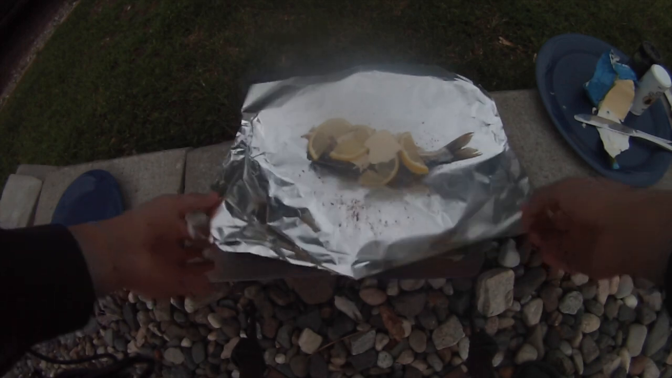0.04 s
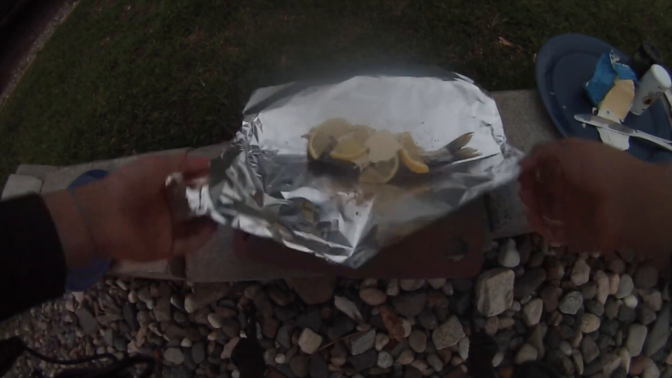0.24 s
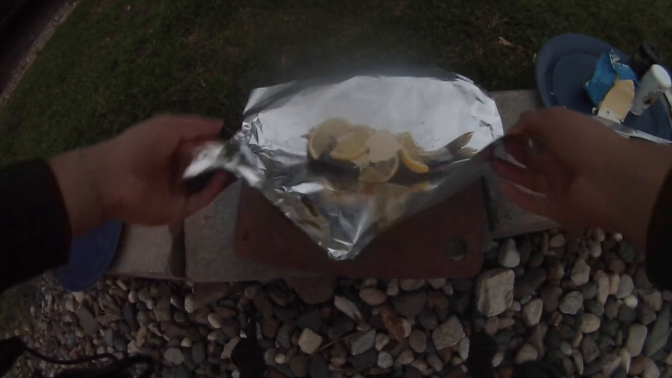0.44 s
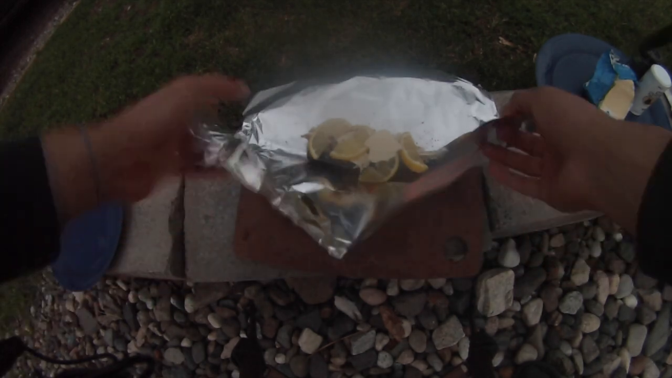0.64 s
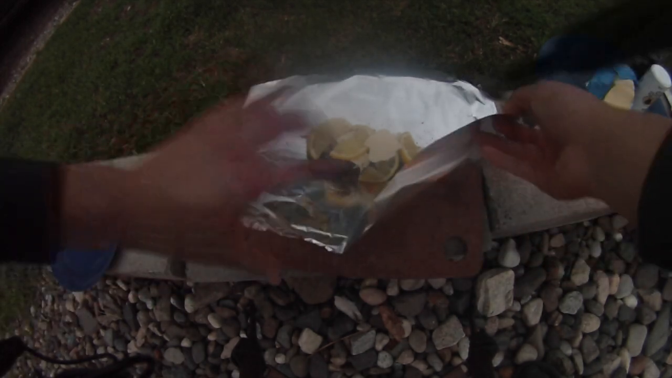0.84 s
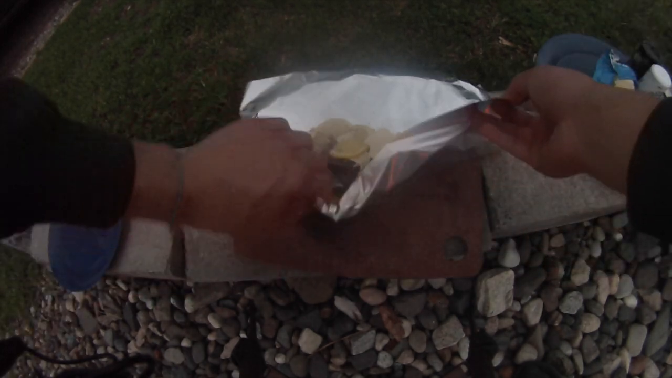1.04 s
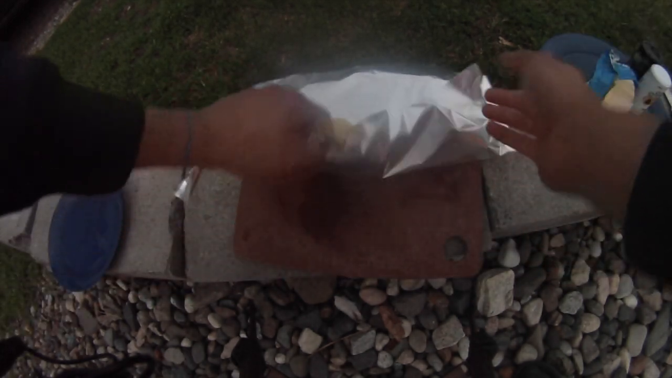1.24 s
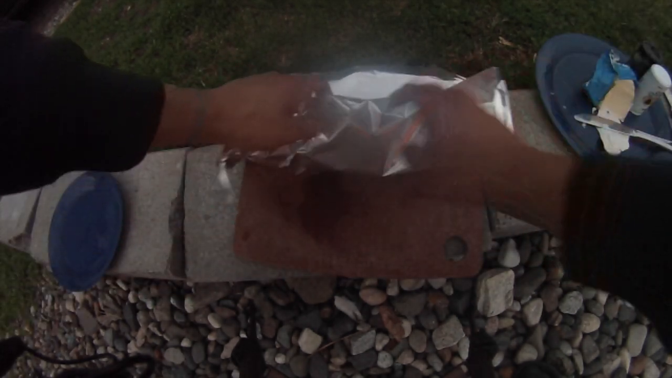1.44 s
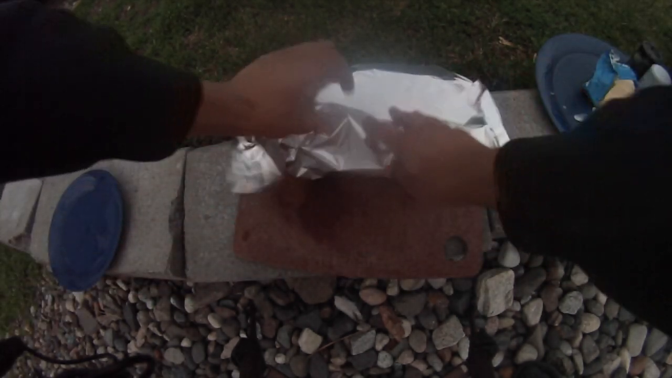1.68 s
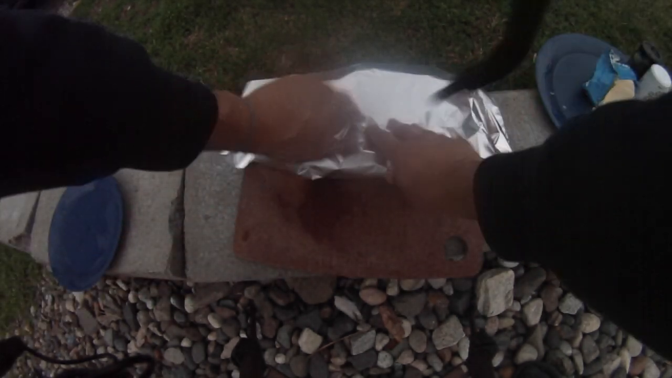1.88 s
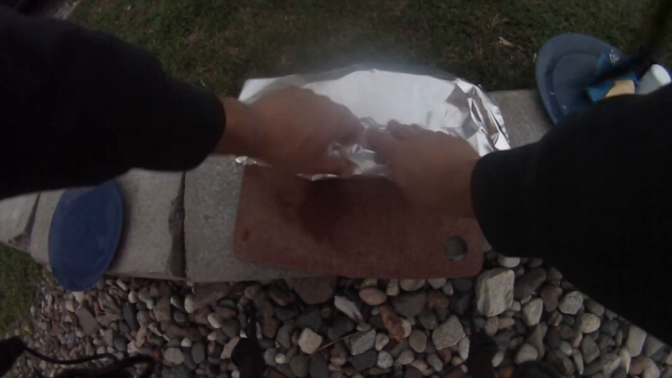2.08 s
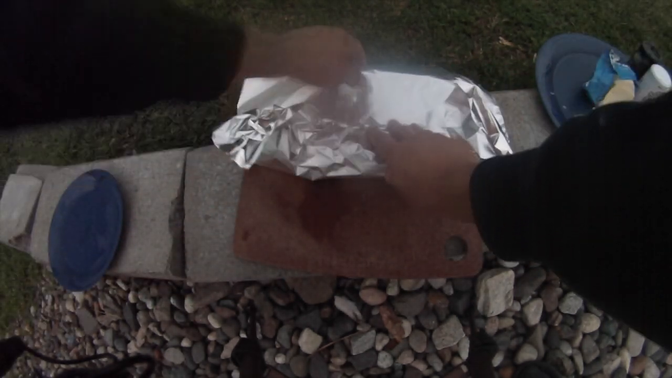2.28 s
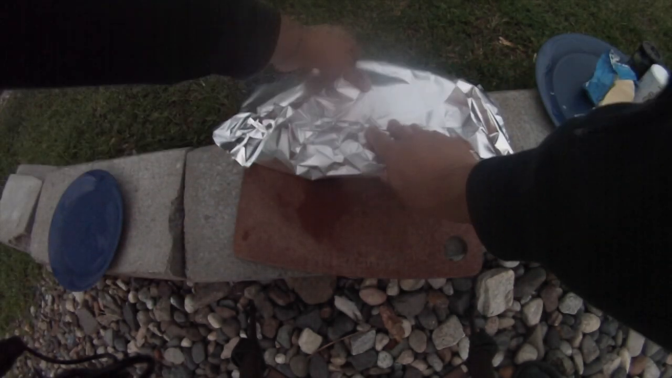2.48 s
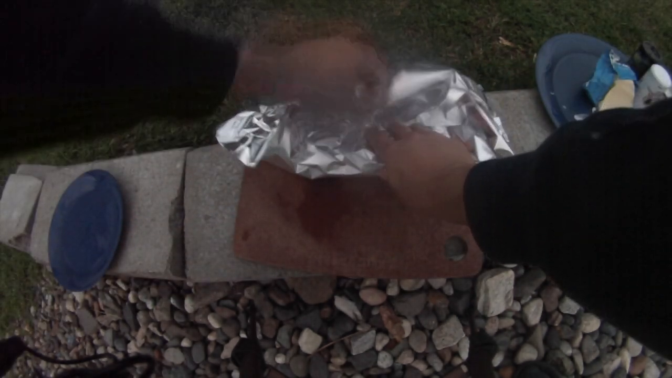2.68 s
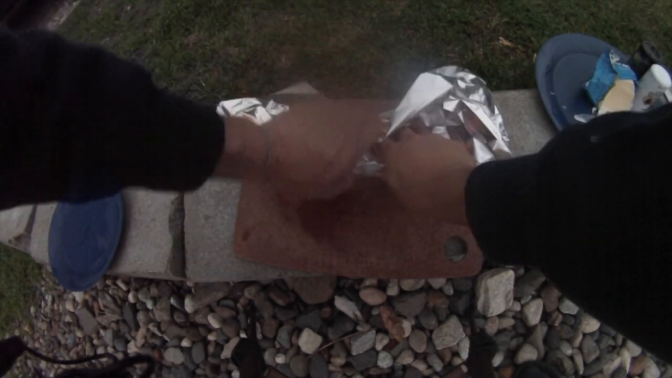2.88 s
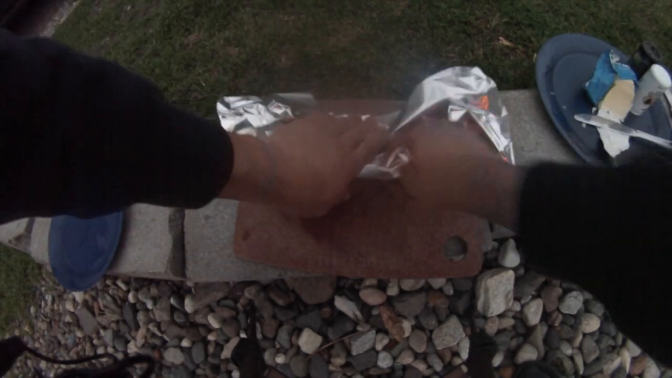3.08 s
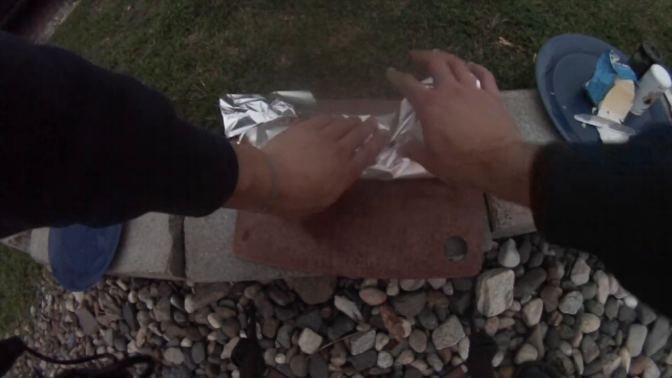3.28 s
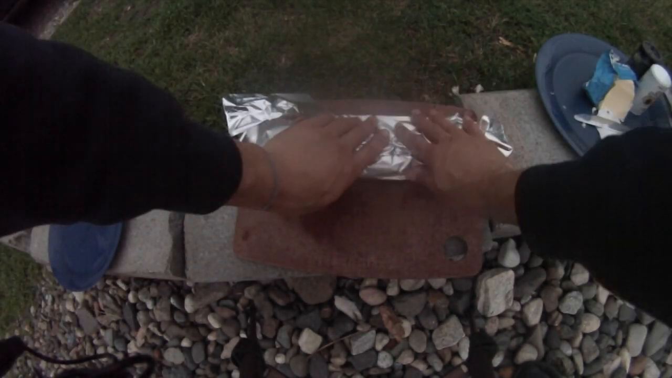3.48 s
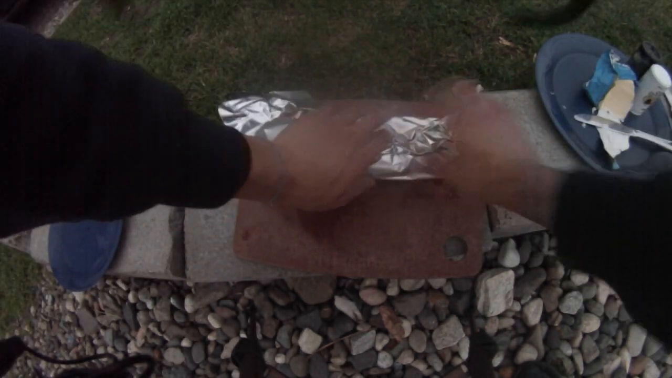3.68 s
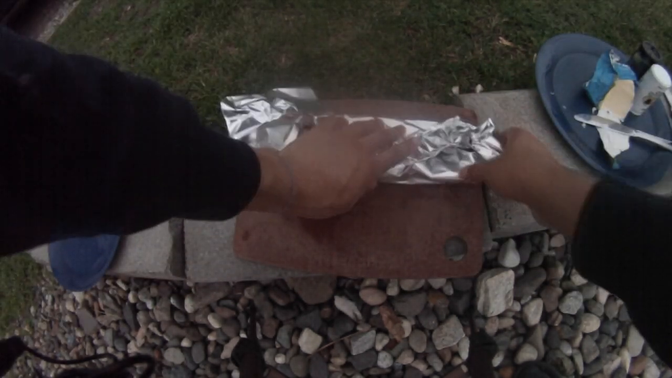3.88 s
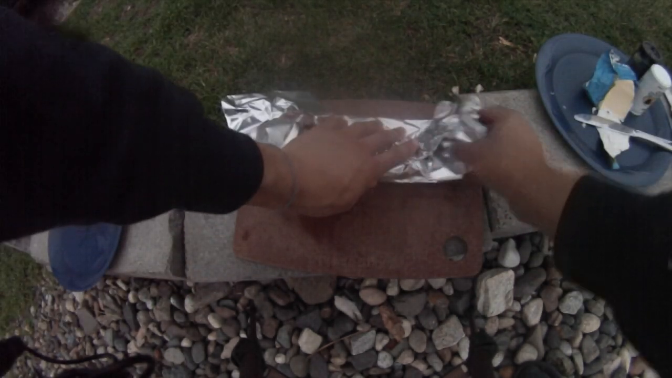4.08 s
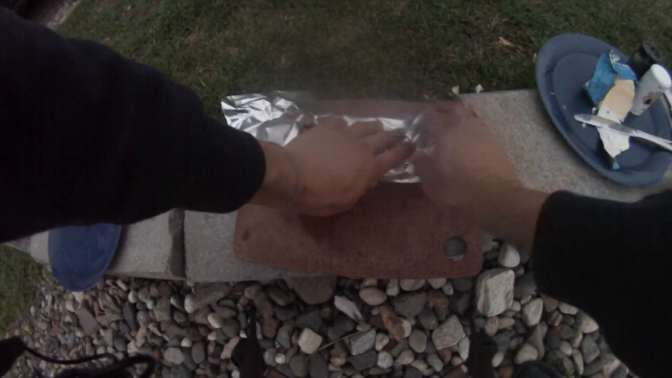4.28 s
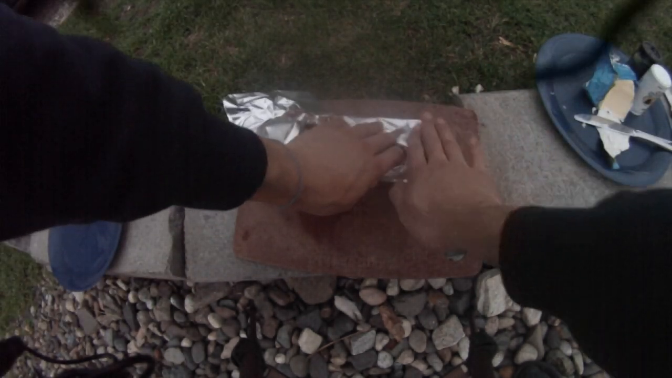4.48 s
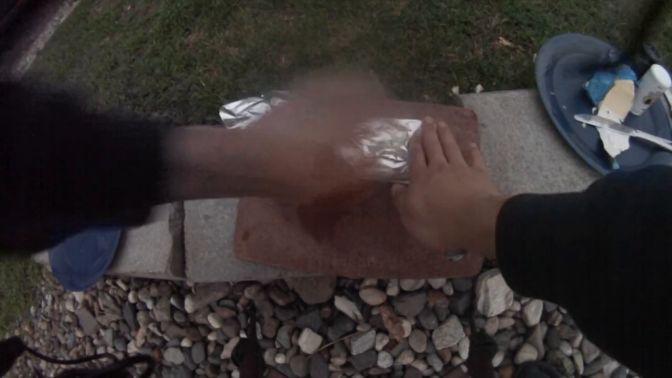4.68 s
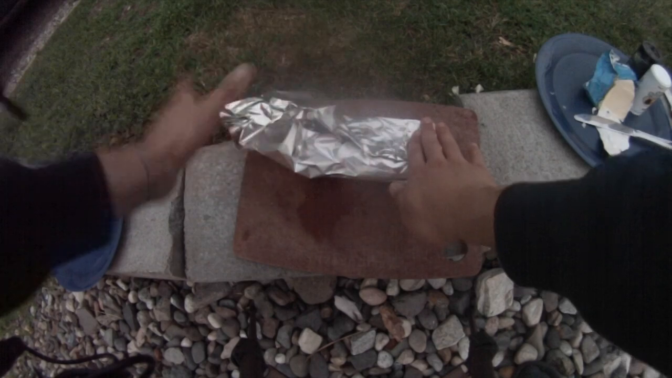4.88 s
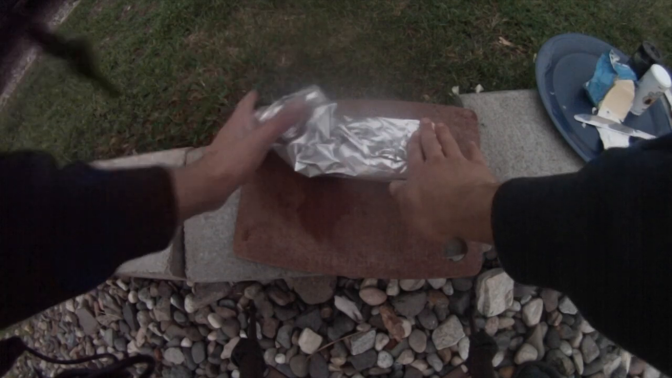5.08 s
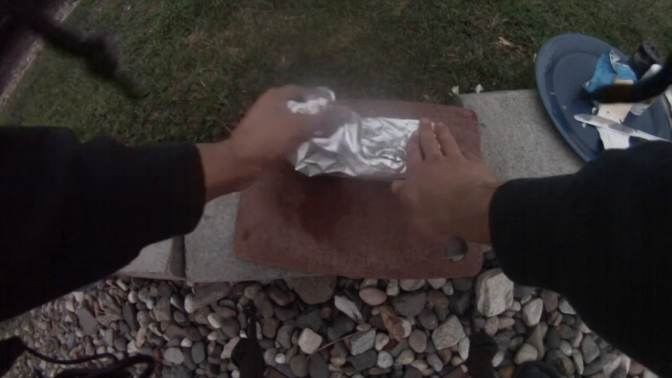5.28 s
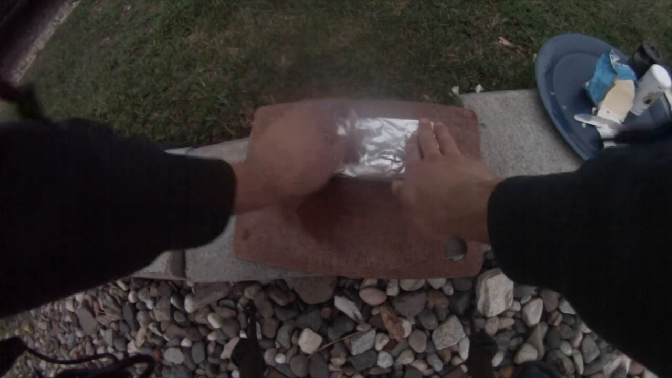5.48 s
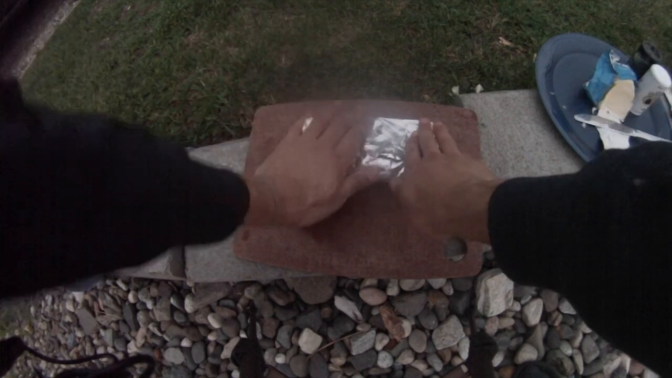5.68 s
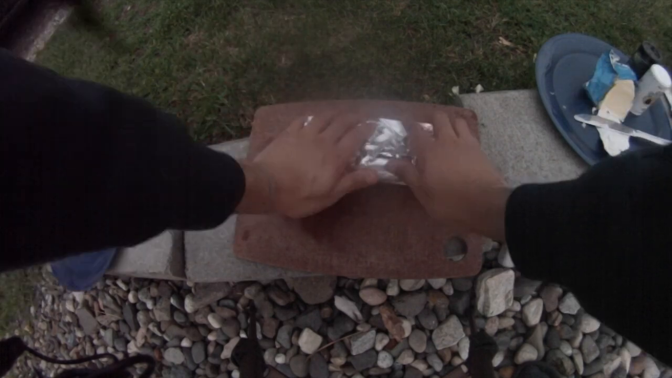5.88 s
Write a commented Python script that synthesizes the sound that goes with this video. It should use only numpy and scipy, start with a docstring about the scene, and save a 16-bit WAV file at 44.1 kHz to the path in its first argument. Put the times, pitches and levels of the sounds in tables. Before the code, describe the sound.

Aluminium foil crinkles and crackles loudly up close as hands fold and crimp it around food, in a quiet garden.

```python
"""In a quiet garden, two hands fold aluminium foil over food on a board and crimp its ends.
Every move sets off a swarm of tiny buckles, made of filtered noise that flares up and dies away:
creases tick, fine wrinkles fizz, wider panels flex and the parcel thuds under the palms.
Loose foil shimmers on after each buckle; crimped tight it crackles dry. Single snaps, soft bumps
and hollow pops stand out, over a faint answer from the yard, a thin steady hiss and garden noise."""
import sys
import numpy as np
from scipy import signal
from scipy.io import wavfile
from scipy.ndimage import uniform_filter1d

SR = 44100
rng = np.random.default_rng(int(sys.argv[2]) if len(sys.argv) > 2 else 0)


def wrap_up_sound(samples):
    """Save the sound to the file named by the first command line argument, as 16-bit audio."""
    columns = np.atleast_2d(samples).T
    # keep every value between -1 and 1, then stretch to whole-number steps
    tamed = np.clip(columns, -1, 1)
    steps = np.round(tamed * 32767).astype(np.int16)
    wavfile.write(sys.argv[1], SR, steps)


N = 261732
TIME = np.arange(N) / SR

# How the state of the foil changes. Each row: time in seconds, buckles per second,
# spread of their sizes in dB, shimmer of the loose sheet in dB.
FOIL_STATE = [(0, 590, 2.5, 0), (.75, 1120, 6, 4), (1.3, 550, 4, 1.5), (1.6, 400, 3, -4),
              (2.2, 410, 4.5, -6), (2.5, 1100, 3, 0.5), (2.9, 880, 4, -4), (3.4, 750, 3, -5.5),
              (3.9, 490, 3, -5.5), (4.55, 520, 4, -5.5), (4.75, 155, 4.5, -20), (5.1, 700, 3, -8),
              (5.6, 550, 3, -7), (5.93, 550, 3.5, -14)]


def amp(db):
    """Decibels to gain."""
    return 10 ** (np.asarray(db) / 20)


def evened(x):
    """Scales to an rms of 1."""
    return x / np.sqrt(np.mean(x ** 2) + 1e-20)


def follow(rows, t):
    """Reads the columns of a curve at the times t, with straight lines between the rows."""
    s, *columns = np.transpose(rows)
    return [np.interp(t, s, column) for column in columns]


def add(mix, s, sound):
    """Adds a sound into the mix at the time s."""
    part = mix[max(round(s * SR), 0):][:len(sound)]
    part += sound[:len(part)]


def colour(x, points, size=4096):
    """Filters x to the given spectrum without looking ahead, so that clicks keep their sharp fronts."""
    hz, db = np.transpose(points)
    bins_hz = abs(np.fft.fftfreq(size, 1 / SR))
    log_gain = np.log(amp(np.interp(np.log(bins_hz + 1), np.log(hz), db)))
    # the Hilbert transform finds the phase that lets each frequency through as early as possible
    taps = np.fft.ifft(np.exp(signal.hilbert(log_gain).conj())).real
    return signal.oaconvolve(x, taps[:size // 2])[:N]


def dying(energy, t60):
    """Spreads each kick of energy into an exponential decay that falls 60 dB in t60 seconds."""
    keep = amp(-60 / (t60 * SR)) ** 2
    return signal.lfilter([1 - keep], [1, -keep], energy + 1e-12)


def held(start, until, fade):
    """Opens at start and closes at until, each within fade seconds."""
    return np.clip(np.minimum(TIME - start, until + fade - TIME) / fade, 0, 1)


def jolts(rows, rise, t60):
    """Each row (time, level in dB) sets off a quick rise and an exponential decay."""
    out = np.zeros(N)
    t = np.arange(SR // 4) / SR
    for s, db in rows:
        add(out, s, amp(db - 60 * t / t60) * (1 - np.exp(-t / rise)))
    return out


def handling():
    """Effort of the hands: pushes and surges add in power to the grip, and stop when the hands let go."""
    # The hands hold the foil and keep it rustling. Each row: start in seconds, end in seconds,
    # effort in dB.
    grips = [(0, 0.949, -35), (0.949, 2.18, -34), (2.18, 2.32, -41), (2.449, 3.494, -35),
             (3.503, 3.797, -41), (3.802, 4.606, -33), (4.944, 5.75, -32.5), (5.753, 5.95, -34.5)]
    # The fingers press a fold, hold it and ease off. Each row: start in seconds, rise in seconds,
    # hold in seconds, effort in dB.
    pushes = [(0, 0.0013, 0.015, -16.5), (0.053, 0.017, 0.056, -20.5), (0.111, 0.024, 0.0094, -20.5),
              (0.173, 0.0041, 0.028, -22), (0.253, 0.011, 0.028, -29.5), (0.335, 0.0066, .012, -30.5),
              (0.459, 0.0088, 0.03, -28), (0.5153, 0.0022, 0.0089, -19.5), (0.669, 0.0059, 0.028, -23),
              (0.797, 0.014, 0.018, -30), (0.847, 0.0083, 0.055, -27.5), (.955, 0.05, 0.025, -23),
              (1.009, 0.018, 0.0068, -21.5), (1.112, .005, 0.013, -23.5), (1.152, 0.016, 0.026, -26),
              (1.199, 0.012, 0.046, -24), (1.275, 0.014, 0.062, -25), (1.363, .01, 0.032, -23),
              (1.422, 0.014, 0.032, -23.5), (1.63, 0.013, 0.11, -25.5), (1.773, .01, 0.11, -29.5),
              (1.917, .03, 0.029, -25.5), (1.996, 0.0089, 0.042, -31), (2.443, 0.024, 0.027, -23.5),
              (2.504, 0.017, 0.13, -20), (2.688, .015, 0.024, -20), (2.758, .02, 0.05, -28),
              (2.858, .01, 0.017, -24), (2.907, 0.019, 0.024, -21.5), (2.997, 0.008, .1, -25.5),
              (3.173, 0.003, 0.054, -19.5), (3.322, 0.015, 0.06, -19), (3.401, 0.0083, 0.023, -24),
              (3.467, 0.0065, 0.008, -26.5), (3.565, .025, 0.027, -26), (3.718, 0.0035, 0.022, -26),
              (3.77, .01, .025, -46), (3.801, 0.0082, 0.043, -25.5), (3.867, 0.018, 0.11, -29),
              (3.947, 0.022, 0.013, -21), (4.02, 0.017, 0.028, -27), (4.084, 0.014, .11, -27.5),
              (4.253, 0.022, 0.027, -29), (4.342, 0.038, 0.033, -25.5), (4.432, 0.027, .12, -26.5),
              (4.942, 0.0043, 0.012, -31), (5.024, .025, 0.063, -24), (5.131, 0.024, 0.16, -23.5),
              (5.319, 0.021, 0.15, -25), (5.509, 0.047, .1, -24.5), (5.682, 0.016, 0.022, -27),
              (5.773, 0.0084, 0.052, -31)]
    # A long crease gives way at once. Each row: start in seconds, effort in dB.
    surges = [(.4027, -21), (.449, -21), (.573, -21), (.6375, -23), (1.07, -23), (1.535, -22.5),
              (1.562, -23), (3.517, -32.5), (4.988, -22)]
    let_go_s, idle_db = 0.0046, -48  # left alone, the foil settles faintly
    ease_db_per_s = 280  # how fast the effort falls after a push

    power = jolts(surges, rise=0.00054, t60=0.1) ** 2
    t = np.arange(SR // 2) / SR
    for s, rise, hold, db in pushes:
        easing = np.maximum(t - rise - hold, 0)
        push = np.minimum(t / rise, 1) * amp(db - ease_db_per_s * easing)
        add(power, s, push ** 2)
    gripped = sum(held(start, until, let_go_s) * (power + amp(db) ** 2) for start, until, db in grips)
    return np.sqrt(gripped + amp(idle_db) ** 2)


def swarm(at, sizes, lo_hz, hi_hz, t60, uneven_db, count):
    """Each buckle kicks count bands of dense modes unevenly, so each has a colour of its own."""
    edges = np.geomspace(lo_hz, hi_hz, count + 1)
    shimmer = amp(follow(FOIL_STATE, TIME)[2])
    out = np.zeros(N)
    for band in zip(edges, edges[1:]):
        kicks = np.zeros(N)
        unevenness = amp(uneven_db * rng.standard_normal(N)[at])
        kicks[at] = (sizes * unevenness) ** 2
        energy = dying(kicks, t60) + shimmer ** 2 * dying(kicks, t60=0.17)  # a loose sheet rings on
        noise = np.sqrt(energy) * rng.standard_normal(N)
        band_filter = signal.butter(2, band, "bandpass", fs=SR, output="sos")
        out += signal.sosfilt(band_filter, noise)
    return out


def paced(x, size=2400):
    """The hands feed in energy steadily: the buckles of one moment share it out."""
    power = uniform_filter1d(uniform_filter1d(x ** 2, size), size // 2)  # smoothed twice, in samples
    return x / np.sqrt(abs(power) + 1e-12)


def crumpling():
    """One swarm of buckles sounds in creases, fine wrinkles, wide panels and the parcel beneath."""
    # Level of each voice against the creases at ordinary effort. Each row: time in seconds,
    # fine wrinkles in dB, wide panels in dB, parcel in dB.
    voice_levels = [(0, -6.5, -18, -34), (.35, -6.5, -13.5, -25), (.53, -3.5, -14, -26),
                    (.74, -8.5, -12.5, -22.5), (1.0, -5.5, -13.5, -26), (1.45, -8.5, -7, -21.5),
                    (2.0, -7.5, -4.5, -18.5), (2.56, -7, -9.5, -16), (2.78, -8.5, -6.5, -15.5),
                    (3.2, -6.5, -6, -16), (3.4, -7, -4.5, -21), (3.55, -6.5, -4, -20), (3.92, -5, -7, -23),
                    (4.38, -6.5, -9, -25.5), (4.49, -7, -2, -27.5), (4.62, -5, -8, -20.5),
                    (5.2, -9, -6.5, -22), (5.62, -10, -6.5, -29)]
    # Tone colours of creases, fine wrinkles, wide panels and the parcel under the palm.
    # Each row: frequency in Hz, gain in dB.
    crease_colour = [(1200, -14), (2000, -3.5), (2500, -2.5), (3200, -2.5), (4200, 0), (5200, -0.5),
                     (6100, 2), (7300, -1), (8800, -4.5), (11000, -11), (16000, -36)]
    fine_colour = [(6000, -6), (8500, 2), (9500, 0), (11500, -1), (13800, -3), (15500, -6.5)]
    panel_colour = [(300, -23), (500, -6), (640, -7.5), (820, -3), (1200, -0.5), (1800, 0), (2400, -5.5),
                    (4000, -27)]
    parcel_colour = [(25, -18), (60, -11.5), (120, -4), (180, 0), (260, 1.5), (350, -0.5), (500, 5.5),
                     (700, -8), (1500, -32)]
    ordinary_db = -30  # effort of light, ordinary handling
    # dB gained per dB of effort: hard pushes sound brighter
    fine_growth, panel_growth, parcel_growth = 1.21, 0.93, 0.86

    fine_db, panel_db, parcel_db = follow(voice_levels, TIME)
    rate, spread_db, _ = follow(FOIL_STATE, TIME)
    at = np.flatnonzero(rng.random(N) < rate / SR)  # buckles come at random moments
    sizes = amp(spread_db * np.minimum(rng.exponential(1, N), 4))[at]  # many small, few large

    creases = swarm(at, sizes, 2077, 9300, t60=0.026, uneven_db=2.5, count=6)
    wrinkles = swarm(at, sizes, 8780, 18000, t60=0.021, uneven_db=4.0, count=3)
    panels = swarm(at, sizes, 521, 2570, t60=0.018, uneven_db=5.5, count=4)
    parcel = swarm(at, sizes, 35, 640, t60=0.015, uneven_db=4, count=2)

    effort = handling() / amp(ordinary_db)
    foil = effort * paced(colour(creases, crease_colour))
    foil += effort ** fine_growth * amp(fine_db) * paced(colour(wrinkles, fine_colour))
    foil += effort ** panel_growth * amp(panel_db) * paced(colour(panels, panel_colour))
    foil += effort ** parcel_growth * amp(parcel_db) * paced(colour(parcel, parcel_colour))
    return amp(ordinary_db) * foil


def hiss():
    """A thin, high, steady hiss: noise that is strongest around 10.5 kHz."""
    noise = colour(rng.standard_normal(N), [(3000, -25), (8000, -11), (10500, 6), (15000, -8)])
    return amp(-50) * evened(noise)


def garden():
    """The quiet garden: steady, soft broadband noise, fuller around 150 Hz and airy around 3 kHz."""
    # Tone colour of the garden. Each row: frequency in Hz, relative level in dB.
    garden_colour = [(25, -2), (60, -1), (150, 4), (400, -9), (1000, -5), (3000, -1.5), (8000, -18),
                     (15000, -16)]
    return amp(-54) * evened(colour(rng.standard_normal(N), garden_colour))


def snaps():
    """A facet flips over: a sharp front, a few milliseconds of chatter and a short ring near its pitch."""
    # Single sharp snaps. Each row: start in seconds, relative level in dB, ring of the facet in Hz.
    snap_rows = [(0.203, 2.5, 5600), (.315, -10, 5500), (.454, -7, 6000), (.574, -13, 5000),
                 (.892, -20, 5000), (1.029, -2, 6500), (1.301, -1, 6840), (1.447, -4, 6300),
                 (1.488, -0.5, 5670), (1.493, -4.5, 6610), (1.565, -10, 5720), (1.612, -7.5, 7700),
                 (1.664, -12, 3960), (1.746, -10, 1340), (1.796, -7, 5900), (1.843, -8, 7000),
                 (1.862, -3, 6160), (1.876, -3, 4170), (1.956, -6, 5310), (1.974, -2, 6160),
                 (2.041, -13, 5800), (2.076, -13.5, 1240), (2.095, -16, 5700), (2.109, -10, 6150),
                 (2.171, -7, 6160), (2.307, -13, 5000), (2.375, -21.5, 6500), (2.589, -2, 5800),
                 (2.629, -8, 5440), (3.0187, -3, 4040), (3.082, -10, 5960), (3.113, -2, 5870),
                 (3.219, 1, 795), (3.3825, -6, 7130), (3.398, 2.5, 830), (3.455, -4, 6100),
                 (3.662, -11, 6260), (3.9237, -3.5, 9500), (3.942, -3, 7000), (3.971, -5, 6000),
                 (4.009, -6, 4740), (4.139, -6, 7100), (4.1952, -1, 6800), (4.246, -7.5, 6560),
                 (4.262, -3.5, 6300), (4.355, -6, 4660), (4.491, -4.5, 6040), (4.547, -6, 4430),
                 (4.575, 2, 5750), (4.593, -3.5, 5500), (4.6, -4, 4730), (4.645, -15.5, 7100),
                 (4.655, -16, 1680), (4.666, -19, 7500), (4.671, -21, 1360), (4.69, -15.5, 9400),
                 (4.702, -24, 5950), (4.719, -16, 5450), (4.725, -17, 7200), (4.755, -17, 5710),
                 (4.802, -26, 6930), (4.838, -14.5, 2820), (4.859, -17, 7700), (4.866, -16.5, 8000),
                 (4.905, -17, 5960), (4.926, -11, 4430), (4.949, -9, 4240), (4.9885, -6, 5000),
                 (5.045, -4, 4060), (5.095, 0, 5740), (5.171, -3, 6060), (5.199, -2, 5000),
                 (5.225, -0.5, 4300), (5.44, -1, 5800), (5.521, -8, 1370), (5.605, 2, 1700),
                 (5.64, -1, 5360), (5.672, -4, 5070), (5.744, -2, 4530), (5.778, -5, 1320),
                 (5.796, -7, 1580), (5.8832, -2, 5840)]
    out = np.zeros(N)
    t = np.arange(SR // 25) / SR
    for s, db, hz in snap_rows:
        chatter = rng.standard_normal(len(t))
        ring = signal.lfilter(*signal.iirpeak(hz, 2.5, SR), chatter)
        fall = amp(db - 60 * t / 0.016)  # 60 dB in 16 ms
        add(out, s, fall * (amp(-14.5) * chatter + amp(-11.0) * evened(ring)))
    snap_colour = [(60, -26), (350, -8.5), (900, 0.0), (2500, -3.5), (6000, -2.5), (9000, -3.5), (15000, -6)]
    return colour(out, snap_colour)


def bumps():
    """A palm bumps the filled parcel, which gives a soft, damped thud of noise around one pitch."""
    # Bumps of the palm. Each row: start in seconds, level in dB, centre of the thud in Hz.
    bump_rows = [(.938, -36, 261), (1.115, -45.5, 99), (2.238, -38, 260), (2.288, -38, 260),
                 (2.478, -40, 110), (2.925, -37, 250), (3.183, -27, 780), (3.208, -31.5, 160),
                 (3.34, -23.5, 700)]
    out = np.zeros(N)
    for s, db, hz in bump_rows:
        body = signal.lfilter(*signal.iirpeak(hz, 2.2, SR), rng.standard_normal(N))
        out += jolts([(s, db)], rise=0.0022, t60=0.18) * evened(body)
    return out


def pops():
    """A wide panel turns inside out with a short rattle and rings hollow in decaying sine tones."""
    # Hollow pops of a wide panel. Each row: start in seconds, level in dB, tilt in dB per octave.
    pop_rows = [(2.2406, -10.5, 5), (2.2894, -13.5, 1), (2.3214, -22.5, 0), (2.667, -15, 5)]
    # What that panel rings with. Each row: frequency in Hz, relative level in dB before the tilt,
    # time to fall 60 dB in seconds.
    panel_modes = [(390, -21, 0.041), (764, -17.5, 0.097), (1072, -1.5, 0.042), (1370, -18, 0.05),
                   (1574, -1, 0.026), (2090, -10.5, 0.021), (2340, -6.5, 0.019), (2810, -1.5, 0.012),
                   (3430, -3.5, 0.014), (4320, -12.5, .02)]
    out = np.zeros(N)
    t = np.arange(SR // 8) / SR
    for s, db, tilt_db in pop_rows:
        ring = np.zeros(len(t))
        for hz, level, t60 in panel_modes:
            tilted_db = level + tilt_db * np.log2(hz / 1000)
            tone = np.sin(2 * np.pi * (hz * t + rng.random()))
            ring += amp(tilted_db - 60 * t / t60) * tone
        ring *= 1 - np.exp(-t / 0.0026)  # the ring needs a moment to build up
        dulled_noise = signal.lfilter([.4], [1, -.6], rng.standard_normal(len(t)))
        rattle = dulled_noise * amp(-4.5 - 60 * t / 0.025)
        add(out, s, amp(db) * (ring / abs(ring).max() + rattle))
    return out


def tail(x, t60, delay):
    """A diffuse, dying answer to x: convolving with fading noise of unit energy smears it out."""
    t = np.arange(SR // 3) / SR
    taps = rng.standard_normal(len(t)) * amp(-60 * t / t60) * (t > delay)
    return signal.oaconvolve(x, taps / np.linalg.norm(taps))[:N]


def scene():
    """The foil, a faint answer from the yard, the hiss and the quiet garden."""
    foil = crumpling() + snaps() + bumps() + pops()
    yard = amp(-18) * tail(foil, t60=0.22, delay=0.0054)
    return (foil + yard + hiss() + garden())[None]


def record(dry):
    """The recorder's band limit: a steep low-pass filter at 15640 Hz."""
    low_pass = signal.firwin(401, 15640, window=("kaiser", 9), fs=SR)
    return signal.oaconvolve(dry, low_pass[None], "same")


dry = scene()
out = record(dry)
wrap_up_sound(out)
```